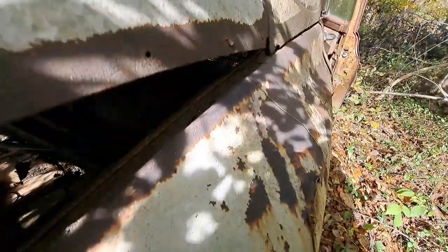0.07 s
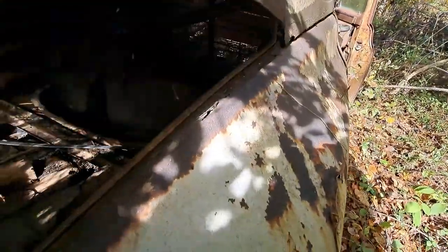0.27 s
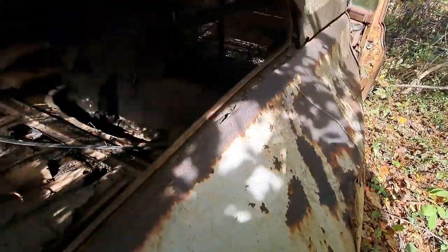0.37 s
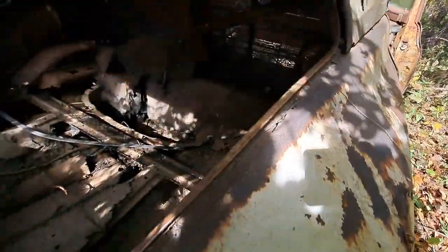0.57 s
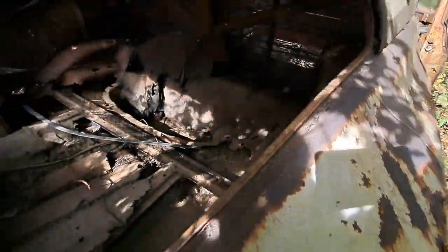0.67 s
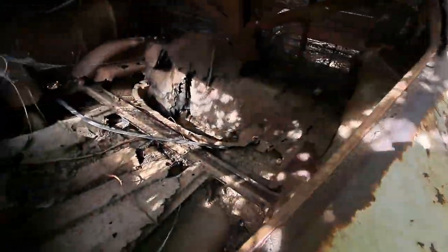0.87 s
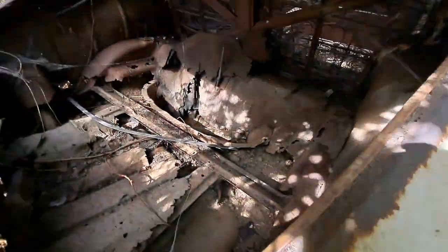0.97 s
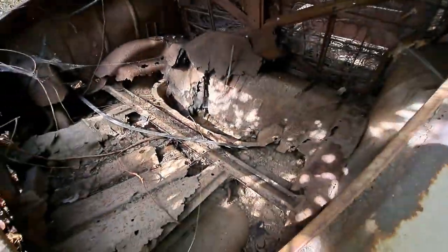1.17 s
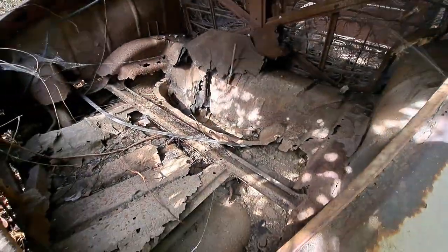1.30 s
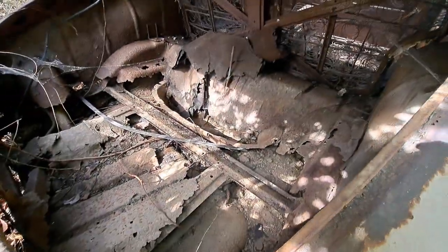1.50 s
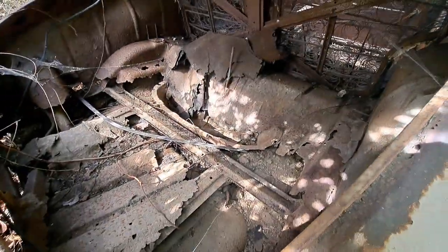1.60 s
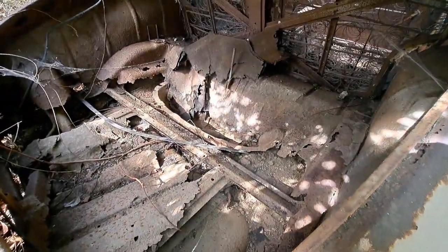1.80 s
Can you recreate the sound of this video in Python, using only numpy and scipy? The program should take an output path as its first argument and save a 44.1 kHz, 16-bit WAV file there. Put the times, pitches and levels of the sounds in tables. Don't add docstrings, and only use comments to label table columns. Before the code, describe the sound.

A rusty sheet-metal hood is heaved open outdoors, close by in stereo. Faint scraping and light knocks begin, swelling from 0.4 to 0.9 seconds into clustered hollow knocks, rasping and low booms, with a faint hinge sigh, leaf rustle and sharp twig snaps. A small metal part clinks brightly at 1.17. Sparse ticks and a snap near 1.55 follow over faint wind and a distant throbbing engine.

```python
import sys
import numpy as np
from scipy import signal
from scipy.io import wavfile

SR = 44100
rng = np.random.default_rng(int(sys.argv[2]) if len(sys.argv) > 2 else 0)


def materialize(psi):
    bounded = np.clip(np.atleast_2d(psi).T, -1, 1)
    quanta = np.round(bounded * 32767).astype(np.int16)
    wavfile.write(sys.argv[1], SR, quanta)


def convert_level_to_amplitude(level_db):
    exponent = np.asarray(level_db, float) / 20
    return 10 ** exponent


N = 81585

CUTOFF_HZ = 16800
ALIKE, LEFT_LEADS_S = 0.36, 0.00043


def rms_one(x):
    return x / np.sqrt(np.mean(x ** 2) + 1e-20)


def in_time(rows):
    s, *columns = np.transpose(rows)
    return [np.interp(np.arange(N) / SR, s, c) for c in columns]


def drift(rate):
    r = np.exp(-80 * np.pi * rate / SR)
    noise = rng.standard_normal(N // 40 + 2002)
    slow = signal.lfilter([1], [1, -2 * r, r * r], noise)[2000:]
    return np.interp(np.arange(N) / 40, np.arange(len(slow)), rms_one(slow))


def ring(clicks, hz, t60):
    r, w = convert_level_to_amplitude(-60 / (t60 * SR)), 2 * np.pi * hz / SR
    return signal.lfilter([0, np.sin(w)], [1, -2 * r * np.cos(w), r * r], clicks + 1e-18)


def struck(s, rise_s, t60):
    t = np.maximum(np.arange(N) / SR - s, 0)
    return (1 - np.exp(-t / rise_s)) * convert_level_to_amplitude(-60 * t / max(t60, 0.005))


def grains(per_s, spread_db):
    sizes = convert_level_to_amplitude(spread_db * np.minimum(rng.exponential(1, (2, N)), 5))
    signs = rng.choice([-1, 1], (2, N))
    return sizes * signs * (rng.random((2, N)) < per_s / SR)


def band_noise(low_hz, high_hz):
    sos = signal.butter(3, [low_hz, high_hz], "band", fs=SR, output="sos")
    return rms_one(signal.sosfilt(sos, rng.standard_normal((2, N))))


def coloured(pair, spectrum, patchy_db):
    out, edges = 0, 30 * 2 ** np.arange(0, 9.6, 0.5)
    hz, db = np.transpose(spectrum)
    for k, (low, high) in enumerate(zip(edges, edges[1:])):
        sos = signal.butter(2, [low, min(high, 0.47 * SR)], "band", fs=SR, output="sos")
        band = signal.sosfilt(sos, np.roll(pair, 997 * (k % 2), axis=1))
        level_db = np.interp(np.log(low * high) / 2, np.log(hz), db)
        out = out + convert_level_to_amplitude(level_db + patchy_db * drift(17.0)) * band
    return rms_one(out)


def pan(pan_db):
    return convert_level_to_amplitude(np.array([[pan_db / 2], [-pan_db / 2]]))


def spaced(pair, alike, lag_s, pan_db):
    alike = np.clip(alike, 0, 1)
    right = alike * np.roll(pair[0], int(lag_s * SR)) + np.sqrt(1 - alike ** 2) * pair[1]
    return np.array([pair[0] * convert_level_to_amplitude(pan_db / 2), right * convert_level_to_amplitude(-pan_db / 2)])


HOOD_ALIKE, HOOD_LEAD_S = 0.74, 0.00033
SLIPS_PER_S, SLIP_SPREAD_DB = 600, 4
KNOCK_SPREAD_DB, KNOCK_SMEAR_S, FAVOUR_DB_PER_OCTAVE = 2.5, 0.005, 9
# (time [s], level [dB], left-right [dB])
HEAVE = [(0.0, -48, -3), (0.292, -44, 0), (0.54, -32, 3), (0.608, -29, 4.5), (0.638, -32, 1.5),
         (0.772, -33.5, 2.5), (0.818, -39, -1), (0.838, -33.5, 2), (0.994, -46.5, -2.5),
         (1.324, -56.5, 1.5), (1.34, -45.5, -1.5), (1.44, -55.5, -0.5), (1.52, -59, 2), (1.85, -81, 6)]
PANEL_HZ = [200, 255, 343, 400, 469, 540, 637, 673, 729, 822, 873, 1255, 1660, 1865]
# (level [dB], t60 [s])
PANEL_MODES = [(-9, 0.094), (-7.5, 0.055), (-9.5, 0.26), (-2, 0.066), (-3.5, 0.14), (-4.5, 0.14),
               (-56, 0.021), (-3.5, 0.11), (-10.5, 0.09), (-2.5, 0.054), (-3, 0.094), (0, 0.063),
               (-27.5, 0.072), (-3.5, 0.16)]
# (frequency [Hz], level [dB per Hz])
RASP = [
    (88, -34),
    (150, -14),
    (280, -15.5),
    (466, -3),
    (578, -5.5),
    (888, -3.5),
    (1140, -7.5),
    (1900, -20.5),
    (16000, -76),
]
# (time [s], peak level [dB], dry crack re peak [dB], favoured pitch [Hz])
KNOCKS = [(.004, -32.5, -11, 825), (0.029, -30, -23, 760), (0.166, -33.5, -6, 600), (.411, -29.5, -6, 696),
          (0.4535, -24, 3, 1280), (0.516, -21, -10, 400), (0.565, -19, -4, 800), (0.586, -13, -10, 564),
          (0.602, -16.5, -14.5, 610), (.611, -18.5, -17.5, 740), (0.627, -19, -18, 463),
          (0.652, -20, -19, 840), (0.682, -19, -25, 462), (.693, -25, -32, 500), (0.705, -24, -28, 450),
          (.721, -23.5, -36, 420), (0.737, -23, -7, 400), (0.748, -23, -14, 704), (0.763, -28.5, -7, 750),
          (0.831, -30, -16, 760), (.845, -24.5, -21, 594), (.872, -28, -20, 500), (1.331, -32, -24, 482)]


def hood():
    heave_db, pan_db = in_time(HEAVE)
    slips = convert_level_to_amplitude(heave_db - 6.5) * rms_one(grains(SLIPS_PER_S, SLIP_SPREAD_DB)) / 20
    s, knock_db, _, favoured_hz = np.transpose(KNOCKS)
    both = (len(s), 2)
    out = convert_level_to_amplitude(heave_db - 1) * coloured(rng.standard_normal((2, N)), RASP, patchy_db=2.5)
    for hz, (level_db, t60) in zip(PANEL_HZ, PANEL_MODES):
        reach_db = knock_db - FAVOUR_DB_PER_OCTAVE * np.abs(np.log2(hz / favoured_hz))
        size_db = reach_db[:, None] - 6.5 + KNOCK_SPREAD_DB * rng.standard_normal(both)
        blows = convert_level_to_amplitude(size_db) * rng.choice([-1, 1], both)
        at = ((s + KNOCK_SMEAR_S * rng.random(len(s))) * SR).astype(int)
        hits = slips.copy()
        hits[:, at] += blows.T
        out += convert_level_to_amplitude(level_db) * ring(hits, hz, 0.66 * max(t60, 0.01))
    cracks = sum(convert_level_to_amplitude(db + crack_db - 3) * struck(at_s, 0.0051, 0.095) for at_s, db, crack_db, _ in KNOCKS)
    out += band_noise(490, 4600) * cracks
    return spaced(out, HOOD_ALIKE, HOOD_LEAD_S, pan_db)


TAP_S, TAP_DB, TAP_LENGTH_S = 0.166, -35, 0.014
TAP_FROM_HZ, TAP_TO_HZ, SWEEP_S = 3500, 480, 0.003


def tap():
    t = np.arange(N) / SR - TAP_S
    hz = TAP_TO_HZ + (TAP_FROM_HZ - TAP_TO_HZ) * np.exp(-np.maximum(t, 0) / SWEEP_S)
    shape = np.abs(np.sin(np.pi * np.clip(t / TAP_LENGTH_S, 0, 1))) ** 0.5
    sweep = shape * np.sin(2 * np.pi * np.cumsum(hz) / SR)
    return convert_level_to_amplitude(TAP_DB) * spaced([sweep, 0], 0.44, HOOD_LEAD_S, 0)


BOOM_RISE_S = 0.005
# (time [s], peak level [dB], frequency [Hz], t60 [s])
BOOMS = [
    (0.192, -29.5, 59.8, 0.36),
    (0.37, -23, 99.4, 0.11),
    (0.407, -32, 195, 0.078),
    (0.498, -12, 194, 0.037),
    (0.516, -30, 192, 0.077),
    (0.623, -21.5, 63.4, 0.19),
    (0.887, -17, 66.5, 0.14),
    (0.931, -17, 110, 0.047),
    (1.027, -34.5, 54.5, 0.15),
    (1.328, -41, 92, 0.16),
]
# (time [s], level [dB])
FLEX = [
    (0.0, -56),
    (0.184, -50.5),
    (0.55, -41.5),
    (1.318, -61),
    (1.85, -71),
]


def booms():
    t = np.arange(N) / SR
    flex_db, = in_time(FLEX)
    out = convert_level_to_amplitude(flex_db + 8.5) * band_noise(37, 130.8)
    for s, db, hz, t60 in BOOMS:
        lag = rng.uniform(1, 1.33) * np.array([[0], [1]])
        out = out + convert_level_to_amplitude(db) * struck(s, BOOM_RISE_S, t60) * np.sin(2 * np.pi * hz * (t - s) - lag)
    return out


HINGE_WIDTH_HZ = 118
HINGE_ALIKE, HINGE_LEAD_S, HINGE_PAN_DB = 0.88, 0.00052, -6.5
# (time [s], level [dB], centre frequency [Hz])
HINGE = [(0.0, -35.5, 1519), (0.02, -45, 1550), (0.084, -45.5, 1591), (0.132, -53.5, 1563),
         (0.366, -53, 1649), (0.39, -43.5, 1690), (0.432, -46, 1600), (0.472, -35, 1608),
         (0.54, -51.5, 1596), (0.592, -41.5, 1645), (0.706, -59, 1550), (0.758, -41, 1540),
         (0.794, -47, 1606), (0.908, -42, 1547), (1.078, -53.5, 1574), (1.114, -48, 1609),
         (1.36, -60.5, 1619), (1.45, -71.5, 1562)]


def hinge():
    db, hz = in_time(HINGE)
    sos = signal.butter(2, HINGE_WIDTH_HZ, fs=SR, output="sos")
    wobble = signal.sosfilt(sos, rng.standard_normal((2, 2, N)))
    phase = 2 * np.pi * np.cumsum(hz) / SR
    sigh = rms_one(wobble[0] * np.cos(phase) + wobble[1] * np.sin(phase))
    return convert_level_to_amplitude(db + 0.83 * drift(12.0)) * spaced(sigh, HINGE_ALIKE, HINGE_LEAD_S, HINGE_PAN_DB)


GRAINS_PER_S, GRAIN_SPREAD_DB = 4200, 2.5
# (time [s], level [dB])
STIR = [(0.0, -48.5), (0.308, -45), (.54, -37.5), (0.585, -32.5), (0.635, -42), (0.824, -44),
        (0.948, -48.5), (1.18, -51.5), (1.338, -63), (1.524, -71), (1.726, -66), (1.85, -83)]
# (frequency [Hz], level [dB per Hz])
LEAVES = [
    (1180, -2),
    (2000, 3.5),
    (4020, -1.5),
    (6410, -3.5),
    (8000, -7.5),
    (10200, -9),
    (12800, -9.5),
    (15900, -6),
    (16500, -5),
]


def leaves():
    db, = in_time(STIR)
    rustle = coloured(grains(GRAINS_PER_S, GRAIN_SPREAD_DB), LEAVES, patchy_db=3.0)
    return convert_level_to_amplitude(db) * spaced(rustle, 0.05, LEFT_LEADS_S, 0.1)


SNAP_RISE_S, SNAP_HIGH_DB, SNAP_LOW_HZ, SNAP_SPLIT_HZ = 0.0013, -13, 2960, 7760
HEAD_RISE_S, SNAP_HEAD_DB, SNAP_HEAD_T60_S = 0.0002, -4.5, 0.005
SNAP_GRAIN_DB, SNAP_GRAIN_PER_S = 2.5, 180
# (time [s], peak level [dB], low part re peak [dB], t60 [s], left-right [dB])
SNAPS = [(0.407, -42, -1, 0.34, 4), (0.4524, -16.5, -13, 0.051, 4.5), (0.563, -40, 3, 0.068, 0),
         (.586, -48, -3, 0.12, -7), (0.7033, -27.5, -16, 0.063, -1.5), (0.729, -19, -13.5, 0.076, -0.5),
         (0.7544, -21.5, -8.5, 0.057, -0.5), (0.8275, -34.5, -10, 0.42, -7),
         (0.8847, -40.5, -11, 0.035, -12), (0.918, -39, -8.5, 0.17, -1), (0.9938, -23, -20.5, 0.046, -2.5),
         (1.1056, -37, -12.5, 0.057, -6), (1.261, -34.5, -16, 0.15, -3), (1.333, -42.5, -10, .08, -2),
         (1.4284, -45, -14, 0.045, 1), (1.481, -55, -3.5, .05, -6), (1.4893, -41.5, -17, 0.1, 1),
         (1.504, -45.5, -14.5, 0.12, -2), (1.5425, -56, -2, 0.034, 6), (1.5463, -28, -6.5, 0.079, 0.5),
         (1.556, -45, 1, 0.034, -9), (1.568, -60, -2, 0.044, 0), (1.6364, -43.5, -10, 0.19, -2.5),
         (1.658, -37.5, -30, 0.046, 9), (1.718, -44, -9, 0.096, -2.5)]


def snaps():
    low = spaced(band_noise(SNAP_LOW_HZ, SNAP_SPLIT_HZ), ALIKE, LEFT_LEADS_S, 0)
    high = spaced(band_noise(SNAP_SPLIT_HZ, CUTOFF_HZ), ALIKE, LEFT_LEADS_S, 0)
    out = 0
    for s, db, low_db, t60, pan_db in SNAPS:
        head = convert_level_to_amplitude(SNAP_HEAD_DB) * struck(s, HEAD_RISE_S, SNAP_HEAD_T60_S)
        shape = struck(s, SNAP_RISE_S, t60) + head
        out = out + convert_level_to_amplitude(db) * pan(pan_db) * shape * (convert_level_to_amplitude(low_db) * low + convert_level_to_amplitude(SNAP_HIGH_DB) * high)
    return convert_level_to_amplitude(SNAP_GRAIN_DB * drift(SNAP_GRAIN_PER_S)) * out


TICK_CYCLES, TICK_CRACK_DB, TICK_T60_S = 32, -9, 0.012
# (time [s], peak level [dB], ring frequency [Hz], left-right [dB])
TICKS = [(.856, -28, 8170, -19.5), (0.868, -32, 9500, -11), (0.942, -26.5, 5345, 7), (1.077, -30, 5570, 7),
         (1.128, -35.5, 12500, -1), (1.136, -40, 4450, -9), (1.263, -28.5, 12550, 7), (1.29, -40, 12300, 2),
         (1.2646, -42, 7800, 0), (1.4892, -39, 13000, 6), (1.492, -34.5, 6900, 2), (1.5047, -39, 12300, 10),
         (1.5087, -41, 12400, 10)]


def ticks():
    noise = spaced(band_noise(4400, CUTOFF_HZ), ALIKE, LEFT_LEADS_S, 0)
    t, out = np.arange(N) / SR, 0
    for s, db, hz, pan_db in TICKS:
        rung = struck(s, HEAD_RISE_S, TICK_CYCLES / hz) * np.sin(2 * np.pi * hz * t)
        crack = convert_level_to_amplitude(TICK_CRACK_DB) * struck(s, HEAD_RISE_S, TICK_T60_S) * noise
        out = out + convert_level_to_amplitude(db) * (spaced([rung, 0], 1.0, LEFT_LEADS_S, pan_db) + crack)
    return out


PART_DB, PART_LEAD_S, HIT_RISE_S, TICK_RINGS_DB = -8, 0.00037, 0.0007, -14
PART_RESTS_S, REST_T60_S = 1.45, 0.32
CRACK_DB, CRACK_T60_S = -11.5, 0.092
CRACK_LOW_HZ, CRACK_DULL_HZ, CRACK_DULL_DB = 6500, 3000, -17
# (time [s], peak level [dB])
CLINKS = [
    (1.1720, -19.5),
    (1.1741, -10.5),
]
PART_HZ = [4221, 5120, 5619, 5742, 3420, 7535, 7738, 8436, 9835, 11645, 12598, 12816, 13860, 14310]
# (level [dB], t60 [s], left-right [dB], same or opposite sign at the right [+1 or -1])
PART_MODES = [(-21, .09, -10, 1), (-18, .085, -1, 1), (-17, .56, 5, 1), (-16, .27, -3, 1), (-26, .1, 2, 1),
              (-5.5, .055, -10, 1), (-9, .06, -11, 1), (-24, .08, 12, 1), (-18, .064, 11, 1),
              (-12, .05, 4, 1), (-11, .08, 12, -1), (-6, .062, 9, 1), (-15.5, .073, 2, -1),
              (-16, .24, 5, -1)]


def clink():
    (tick_s, tick_db), (hit_s, hit_db) = CLINKS
    t = np.arange(N) / SR
    rung = 0
    for hz, (db, t60, pan_db, sign) in zip(PART_HZ, PART_MODES):
        from_tick = convert_level_to_amplitude(tick_db + TICK_RINGS_DB) * struck(tick_s, HEAD_RISE_S, t60)
        from_hit = convert_level_to_amplitude(hit_db) * struck(hit_s, HIT_RISE_S, t60)
        tone = np.sin(2 * np.pi * hz * (t - hit_s) + rng.uniform(0, 1))
        thrown = convert_level_to_amplitude(db + PART_DB) * pan(pan_db) * np.array([[1], [sign]])
        rung = rung + thrown * tone * (from_tick + from_hit)
    rung *= convert_level_to_amplitude(-60 * np.maximum(t - PART_RESTS_S, 0) / REST_T60_S)
    crack = convert_level_to_amplitude(tick_db + 5.0) * struck(tick_s, HEAD_RISE_S, SNAP_HEAD_T60_S)
    crack = crack + convert_level_to_amplitude(hit_db + CRACK_DB) * struck(hit_s, HIT_RISE_S, CRACK_T60_S)
    dull = convert_level_to_amplitude(CRACK_DULL_DB) * band_noise(CRACK_DULL_HZ, CRACK_LOW_HZ)
    noise = band_noise(CRACK_LOW_HZ, CUTOFF_HZ) + dull
    return rung + crack * spaced(noise, ALIKE, PART_LEAD_S, 1.0)


ENGINE_HZ, ENGINE_DB = 104.05, -48
THROB_DEPTH, THROB_PER_S, THROB_CREST_S = 0.7, 7.1, 1.24


def engine():
    t = np.arange(N) / SR - np.array([[0], [0.002]])
    throb = 1 + THROB_DEPTH * np.cos(2 * np.pi * THROB_PER_S * (t - THROB_CREST_S))
    tone = np.sin(2 * np.pi * ENGINE_HZ * t + 0.62 * drift(21.0))
    return convert_level_to_amplitude(ENGINE_DB + 0.5 * drift(8.5)) * throb * tone


AIR_DB = -51
# (frequency [Hz], level [dB per Hz])
AIR = [
    (30, 5.5),
    (60, -12.5),
    (150, -5),
    (260, -18),
    (860, -14.5),
    (1310, -23.5),
    (3000, -46),
    (16500, -41.5),
]


def open_air():
    floor = coloured(rng.standard_normal((2, N)), AIR, patchy_db=4)
    return convert_level_to_amplitude(AIR_DB) * spaced(floor, 0.28, 0.00026, -3.1)


def scene():
    metal = hood() + tap() + booms() + hinge()
    return metal + leaves() + snaps() + ticks() + clink() + engine() + open_air()


def low_pass(x):
    return signal.sosfilt(signal.butter(12, 16830, fs=SR, output="sos"), x)


LOW_CUT_HZ = 41
# (frequency [Hz], width [Hz], level [dB])
PORT = [
    (7630, 840, 3),
    (12280, 1400, 7),
]


def record(dry):
    x = signal.sosfilt(signal.butter(2, LOW_CUT_HZ, "high", fs=SR, output="sos"), dry)
    for hz, width_hz, db in PORT:
        x = x + (convert_level_to_amplitude(db) - 1) * signal.lfilter(*signal.iirpeak(hz, hz / width_hz, fs=SR), x)
    x = signal.sosfilt(signal.cheby2(12, 70, CUTOFF_HZ, fs=SR, output="sos"), x)
    return low_pass(x)


dry = scene()
out = record(dry)
materialize(out)
```